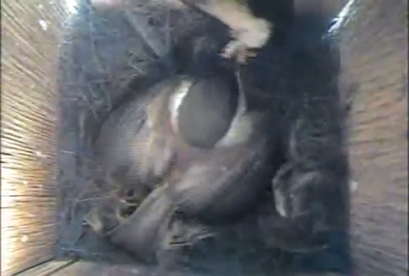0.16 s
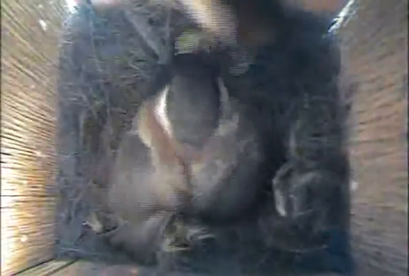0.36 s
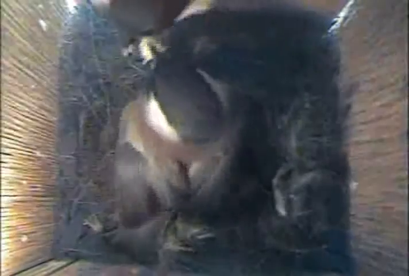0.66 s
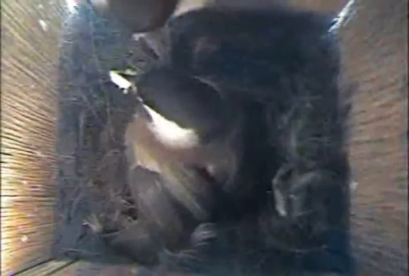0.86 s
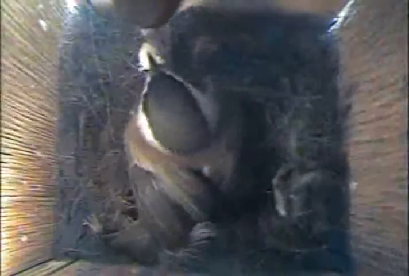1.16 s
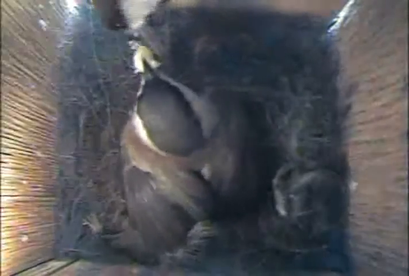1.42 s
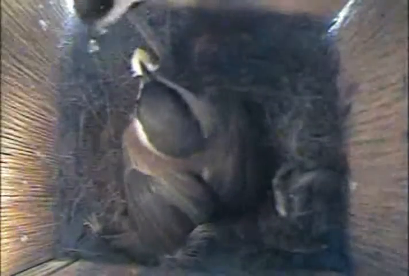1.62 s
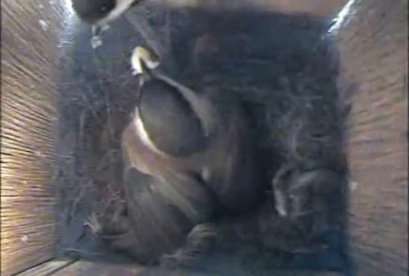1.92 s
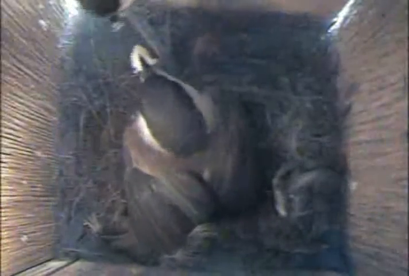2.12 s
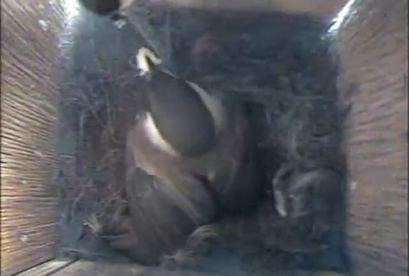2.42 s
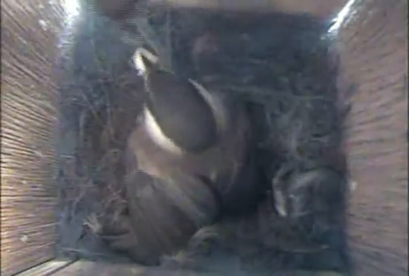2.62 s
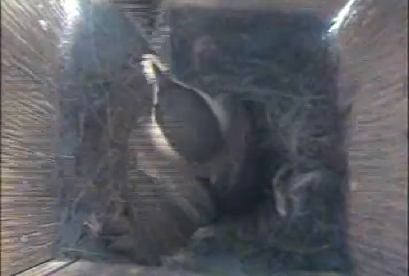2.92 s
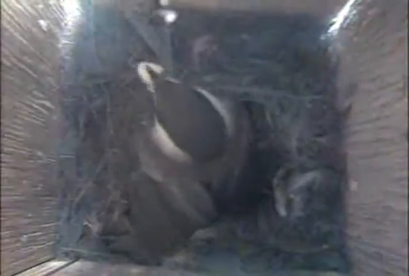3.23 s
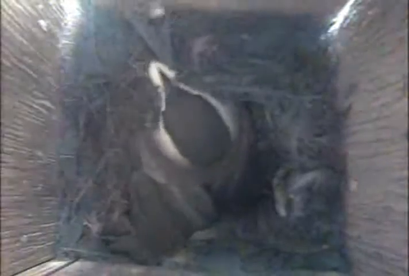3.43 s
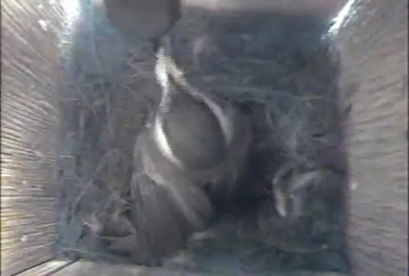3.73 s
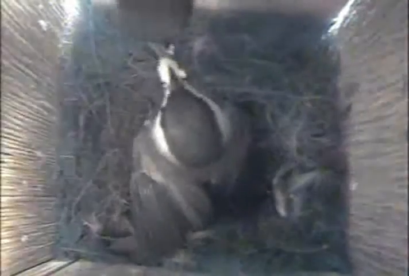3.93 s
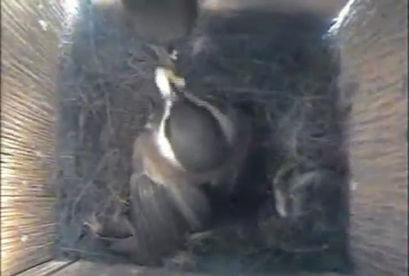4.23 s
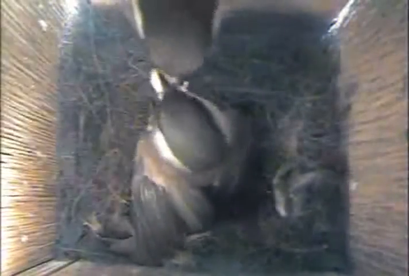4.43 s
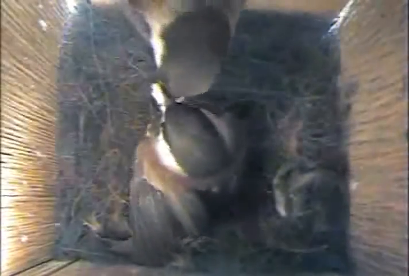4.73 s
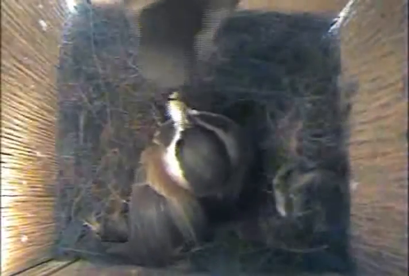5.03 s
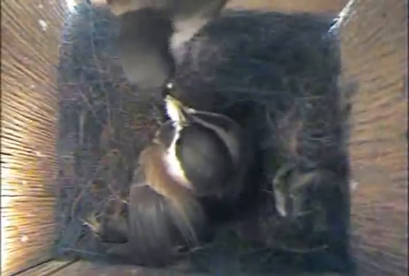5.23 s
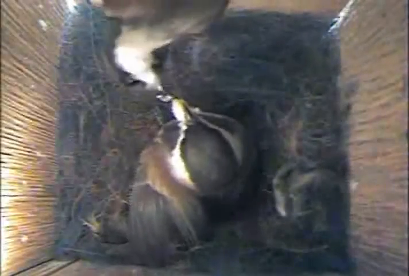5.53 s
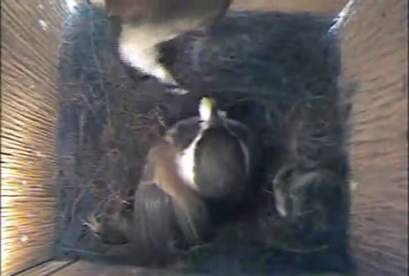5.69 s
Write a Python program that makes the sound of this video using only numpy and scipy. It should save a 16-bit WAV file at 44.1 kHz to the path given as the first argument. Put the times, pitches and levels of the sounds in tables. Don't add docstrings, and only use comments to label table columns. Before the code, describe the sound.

A close, boxy nest interior with a steady distant machine hum, low and fuzzy, gently swelling and easing, plus faint hiss. From 0 to 0.45 s come small claw taps, scrapes and throat smacks on wood. A thin high peep, under a tenth of a second, arches up and drops at 0.6 s; a weaker one follows at 1.2 s, then a faint one at 2.4 s. At 2.8 s a whistle swoops up from lower pitch, a rough deeper arch comes at 3.7 s with taps, and another swoop at 4.1 s. A barely audible outside whistle passes at 4.4 s. Claws knock around 4.9-5.0 s, then a sharp tick and full peep at 5.05 s and a longer peep at 5.24 s. A short, hoarse lower call with squeaky scraps sounds at 5.7 s. Walls ring briefly; sound is left-only, gritty and smeared, the right channel nearly silent.

```python
import sys
import numpy as np
from scipy import signal
from scipy.fft import rfft, irfft, dct, next_fast_len
from scipy.io import wavfile
from scipy.ndimage import uniform_filter1d

SR = 44100
rng = np.random.default_rng(int(sys.argv[2]) if len(sys.argv) > 2 else 0)


def voltage_ratio(level):
    return 10 ** (np.asarray(level, float) / 20)


def output_pcm(signal):
    pcm = np.clip(np.atleast_2d(signal).T, -1, 1) * 32767
    wavfile.write(sys.argv[1], SR, np.round(pcm).astype(np.int16))


N = 258426
FFT_SIZE = next_fast_len(N + 4096)


def evened(x):
    return x / np.sqrt(np.mean(x ** 2) + 1e-20)


def add(mix, start_s, sound):
    part = mix[round(start_s * SR):][:len(sound)]
    part += sound[:len(part)]


def wander(count, size):
    smooth = uniform_filter1d(rng.standard_normal(count), size)
    return evened(uniform_filter1d(smooth, size))


def resonance(centre_hz, width_hz):
    radius = np.exp(-np.pi * width_hz / SR)
    angle = 2 * np.pi * (np.fft.rfftfreq(FFT_SIZE, 1 / SR) - centre_hz) / SR
    return ((1 - radius) / (1 - radius * np.exp(-1j * angle))) ** 2


def through(x, response):
    return irfft(rfft(x, FFT_SIZE) * response, FFT_SIZE)[:N]


def hum():
    # (frequency [Hz], density [dB per Hz])
    floor = [(12, -29.5), (20, -19.5), (64, -9.5), (117, -11), (155, -1.5), (183, -10.5), (301, -2),
             (386, -22.5), (523, -27.5), (750, -22.5), (1540, -33.5), (3160, -42.5), (12300, -48.5),
             (13300, -63.5), (14900, -75)]
    # (centre [Hz], width [Hz], lift [dB])
    lifts = [(1598, 220, 4), (4400, 850, 5.5), (7820, 270, 7.5), (11320, 1200, 4.5), (13420, 600, 25),
             (14020, 510, 6.5)]
    # (centre [Hz], width [Hz], level [dB])
    tones = [(60.2, 5, -54.5), (155.24, 12, -45.5), (307.6, 22, -49.5), (1487, 900, -61.5)]
    # (time [s], level [dB])
    load = [(0.0, 2.7), (.6, 0), (1.0, -1), (1.45, 1), (2.2, -5.5), (3.2, 2.5), (3.7, -1.5), (4.0, 1.5),
            (4.7, 0.5), (5.2, -6), (5.86, -3.5)]
    # (share of load [0-1], drift [dB/s])
    follow = [(.01, -0.54), (1, -0.2), (.3, -2.04), (-.2, 1.37)]
    hz = np.fft.rfftfreq(N, 1 / SR)
    floor_hz, floor_db = np.transpose(floor)
    colour_db = np.interp(np.log(hz + 1), np.log(floor_hz + 1), floor_db)
    colour_db += sum(db * np.exp(-((hz - centre) / width) ** 2) for centre, width, db in lifts)
    out = voltage_ratio(-42) * evened(irfft(rfft(rng.standard_normal(N)) * voltage_ratio(colour_db), N))

    t = np.arange(N) / SR
    load_db = np.interp(t, *np.transpose(load))
    for (centre_hz, width_hz, db), (share, drift_db) in zip(tones, follow):
        tone = through(rng.standard_normal(N), resonance(centre_hz, width_hz))
        tone = evened(tone / uniform_filter1d(abs(tone), size=1500) ** .7)
        out += voltage_ratio(db + share * load_db + drift_db * (t - t.mean())) * tone
    return out


def box_modes():
    # (centre [Hz], width [Hz], level [dB])
    modes = [(1785, 700, -3.5), (3363, 370, 3), (4400, 500, 6), (5500, 450, -0.5), (6350, 740, -0.5),
             (7000, 540, -2.5), (8200, 930, -2), (10140, 330, 3), (11680, 1500, -14)]
    return sum((-1) ** k * voltage_ratio(db) * resonance(hz, 1.236 * width) for k, (hz, width, db) in enumerate(modes))


def walls():
    # (delay [s], level [dB])
    echoes = [(.0009, -12.5), (.0017, -15), (.0031, -11), (.0052, -13)]
    hz = np.fft.rfftfreq(FFT_SIZE, 1 / SR)
    return 1 + sum(voltage_ratio(db) * np.exp(-2j * np.pi * hz * delay_s) for delay_s, db in echoes)


def claws():
    # (time [s], peak level [dB], length [s], ring [Hz], ring level [dB])
    taps = [(.075, -21, 0.0066, 4330, 8), (.227, -29.5, .006, 3480, 13.5), (.240, -31, 0.0071, 3900, 5),
            (.394, -45.5, .004, 4400, 6), (.428, -43, 0.0028, 1900, 9), (.618, -36, 0.002, 2000, -1.5),
            (2.764, -38.5, 0.0047, 1700, 12.5), (1.319, -47.5, 0.0034, 4550, 15),
            (2.771, -35, 0.0033, 8200, 18.5), (3.664, -51, 0.0022, 4500, 1),
            (3.773, -23.5, .0047, 3300, -9), (4.125, -41, .003, 8600, -7), (4.879, -41, 0.0071, 7640, 24),
            (4.936, -42, 0.0087, 8360, 24), (4.983, -20, 0.0066, 3910, 14), (4.990, -19, .0023, 4620, 13)]
    # (time [s], peak level [dB], length [s], ring [Hz], ring level [dB])
    ticks = [(.003, -24.5, 0.003, 3320, 8.5), (.141, -36, 0.0071, 3800, 8), (.153, -26, 0.0078, 5880, 17.5),
             (.154, -29.5, 0.0071, 8200, 18), (.177, -43, 0.0041, 4000, 6), (1.191, -35, 0.0089, 5420, 25),
             (2.381, -38.5, 0.012, 6600, 29), (4.133, -35, 0.0066, 4200, 18), (5.247, -39, .009, 6350, 24),
             (2.452, -37.5, 0.007, 5500, 24), (3.721, -27.5, 0.0083, 8350, 9),
             (4.202, -40, 0.0071, 8100, 24), (.695, -49, .0027, 7500, 11), (5.123, -32.5, 0.0038, 7840, 22),
             (4.854, -44, .0023, 4400, 4), (4.876, -51, 0.01, 6300, 34), (4.885, -39, 0.0041, 3340, 18),
             (4.944, -41, .011, 6330, 17), (5.05, -14.5, 0.0048, 4400, 17.5),
             (5.053, -27.5, 0.0023, 4400, 17), (5.238, -52, .0034, 4400, 11),
             (5.325, -25.5, .0026, 7400, 20)]
    out = np.zeros(N)
    t = np.arange(1024) / SR
    hz = np.fft.rfftfreq(1024, 1 / SR)
    for rows, tilt_db_per_octave in ((taps, -3), (ticks, 1.5)):
        for start_s, db, length_s, ring_hz, ring_db in rows:
            colour_db = tilt_db_per_octave * np.log2((hz + 500) / 4400)
            colour_db += ring_db * np.exp(-((hz - ring_hz) / 600) ** 2)
            scrape = evened(irfft(rfft(rng.standard_normal(1024)) * voltage_ratio(colour_db)))
            stroke = (t / length_s * 4) * np.exp(1 - t / length_s * 4)
            add(out, start_s, voltage_ratio(db) * evened(scrape * stroke) * np.sqrt(np.mean(stroke ** 2)))
    return out


def voice(s, hz, level_db, partials_db, rasp_db, waver):
    t = np.arange(s[0], s[-1], 1 / SR)
    pitch_hz = uniform_filter1d(np.interp(t, s, hz), size=200, mode="nearest")
    pitch_hz = pitch_hz * (1 + waver * wander(len(t), size=90))
    angle = 2 * np.pi * np.cumsum(pitch_hz) / SR
    tone = np.zeros(len(t))
    for k, db in enumerate(partials_db):
        tone += voltage_ratio(np.interp(t, s, db + 0 * s)) * np.sin((k + 1) * angle)
    tone += voltage_ratio(rasp_db) * evened(uniform_filter1d(rng.standard_normal(len(t)), size=3))
    flutter = 1 + .4 * np.tanh(wander(len(t), size=60))
    level = np.sqrt(2) * voltage_ratio(np.interp(t, s, level_db))
    return s[0], level * flutter * tone * signal.windows.tukey(len(t), .08)


def whistle(s, hz, level_db, second_db, rasp_db, waver=0.0039):
    half_db = -17 - 22 * np.clip(hz / 1000 - 5.6, 0, 2)
    return voice(s, hz / 2, level_db, [half_db - 10.0, 0, half_db, second_db], rasp_db, waver)


def arch(start_s, length_s, top_hz, effort_db, push_db, foot_hz, drop_hz, crest, rise_bend, fall_bend, rasp_db):
    lean_hz = 800
    u = np.linspace(0, 1, 60)
    before = np.clip(1 - u / crest, 0, 1)
    after = np.clip((u - crest) / (1 - crest), 0, 1)
    hz = top_hz - lean_hz * before ** 2
    hz -= (top_hz - lean_hz - foot_hz) * before ** rise_bend
    hz -= drop_hz * after ** fall_bend

    shape_db = -7 * before
    shape_db += 10 * np.exp(-((hz - 6970) / 110) ** 2)
    shape_db += -7 * np.exp(-((u - .24) / .09) ** 2)
    shape_db += push_db * np.tanh(1.1 * after)
    second_db = -20 + 4 * before - shape_db + 0.49 * max(push_db, 0)
    return whistle(start_s + length_s * u, hz, effort_db + shape_db, second_db, rasp_db)


def birds():
    # (start [s], length [s], top [Hz], effort [dB], closing push [dB])
    peeps = [
        (0.618, 0.076, 7000, -26.5, -2.5),
        (1.189, 0.076, 6810, -30.5, -5),
        (2.372, 0.087, 7010, -36.5, 12.5),
        (5.054, 0.075, 7030, -28.5, -2),
        (5.236, 0.09, 6850, -32.5, 1.5),
    ]
    # (start [s], length [s], top [Hz], effort [dB], closing push [dB])
    swoops = [
        (2.761, 0.07, 6735, -27.5, -4),
        (4.132, 0.078, 6960, -29.5, -1.5),
    ]
    # (start [s], length [s], top [Hz], effort [dB], closing push [dB])
    far = [
        (1.325, 0.078, 6850, -64, -2),
        (4.409, .082, 6280, -57, -3),
    ]
    # (foot [Hz], end drop [Hz], crest place [0-1], rise bend [power], fall bend [power])
    peep_arch = (5100, 1750, .58, 6.0, 2.8)
    swoop_arch = (3000, 1400, .62, 6.5, 2.6)
    far_arch = (3000, 1600, 0.26, 3.3, 1.7)
    # (time [s], pitch [Hz], level [dB])
    deep_arch = [(3.712, 3197, -34), (3.718, 4400, -29), (3.723, 5500, -29.5), (3.73, 6240, -35),
                 (3.753, 6494, -33.5), (3.764, 5415, -29), (3.769, 4400, -27.5), (3.774, 3104, -27.5),
                 (3.781, 2240, -37)]
    # (time [s], pitch [Hz], level [dB])
    scraps = [
        [(5.667, 1680, -36), (5.677, 2077, -38), (5.681, 3200, -32.5), (5.688, 3450, -42)],
        [(5.713, 3760, -29.5), (5.719, 3296, -30.5), (5.73, 2540, -46)],
    ]
    # (time [s], pitch [Hz], level [dB])
    harsh = [(5.665, 1643, -44), (5.673, 1703, -31.5), (5.677, 2183, -32), (5.688, 2290, -34),
             (5.691, 2640, -26.5), (5.698, 2794, -27.5), (5.712, 2440, -38), (5.716, 2203, -29),
             (5.727, 2215, -57)]
    harsh_partials_db = [-21.5, -1, -9.5, -10.5, -25]
    out = np.zeros(N)
    for rows, kind, rasp_db in ((peeps, peep_arch, -49), (swoops, swoop_arch, -42), (far, far_arch, -49)):
        for row in rows:
            add(out, *arch(*row, *kind, rasp_db))
    s, hz, level_db = np.transpose(deep_arch)
    octave_db = -12.5 + 4.5 * (hz / 1000 - 5.5)
    add(out, *whistle(s, hz, level_db, octave_db, rasp_db=-31, waver=.011))
    for rows in scraps:
        add(out, *whistle(*np.transpose(rows), second_db=-13, rasp_db=-40))
    add(out, *voice(*np.transpose(harsh), harsh_partials_db, rasp_db=-21, waver=0.018))
    return out


def scene():
    modes = box_modes()
    calls = through(birds(), (voltage_ratio(-5.0) + modes) * walls())
    hits = through(claws(), voltage_ratio(-22) + modes)
    heard = calls + hits + hum()
    return np.array([heard, 0 * heard])


def block_rounding(x):
    extra_edges_s = [3.785, 4.981]
    block_s, fade, band_hz = .032, 128, 520
    step_db, spread_db, treble_db_per_khz = -2, -11, 3
    fill_db, hole_db = -12, 28
    edges = np.sort(np.r_[np.arange(-1, N / SR / block_s + 2) * block_s, extra_edges_s])
    edges = np.round(edges * SR).astype(int) + 2048
    x, out = np.pad(x, (2048, 8192)), np.zeros(N + 10240)
    noise = rng.standard_normal(len(x))
    rise = np.sin(np.pi / 2 * (np.arange(fade) + .5) / fade)
    for a, b in zip(edges[:-1], edges[1:] + fade):
        window = np.r_[rise, np.ones(b - a - 2 * fade), rise[::-1]]
        z = dct(x[a:b] * window, norm="ortho")
        size = max(round(band_hz * 2 * (b - a) / SR), 2)
        starts = np.arange(0, b - a, size)
        own = np.add.reduceat(z ** 2, starts) / size + 1e-16
        spread = np.convolve(own, [.3, 0.87, 0.56, 1, 0.95, 0.93, .3])[2:][:len(own)]
        masker = voltage_ratio(2 * spread_db) * spread
        band_khz = starts / (b - a) * SR / 2 / 1000
        coarser_db = treble_db_per_khz * np.clip(band_khz - 8, 0, 3)
        step = voltage_ratio(step_db + coarser_db) * np.sqrt(own + masker)
        fill = np.minimum(voltage_ratio(fill_db) * step, np.sqrt(own))
        fill = fill * (masker < voltage_ratio(2 * hole_db) * own)
        step = np.repeat(step, size)[:b - a]
        fill = np.repeat(fill, size)[:b - a]
        whole = np.round(z / step)
        rounded = np.where(whole == 0, fill * noise[a:b], whole * step)
        out[a:b] += window * dct(rounded, type=3, norm="ortho")
    return out[2048:][:N]


def roll_off(x):
    return signal.sosfilt(signal.butter(12, 15020, fs=SR, output="sos"), x)


def record(dry):
    dulled = signal.oaconvolve(dry[0], signal.firwin(255, 14650, fs=SR), "same")
    live = block_rounding(dulled)
    hiss = signal.lfilter([1], [1, -.9], rng.standard_normal(N))
    dead = dry[1] + voltage_ratio(-95) * evened(hiss)
    return roll_off(np.array([live, dead]))


dry = scene()
out = record(dry)
output_pcm(out)
```